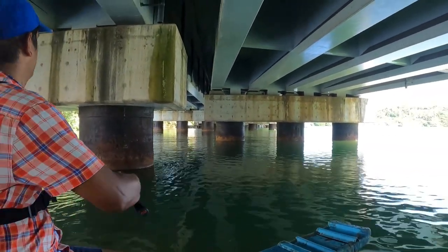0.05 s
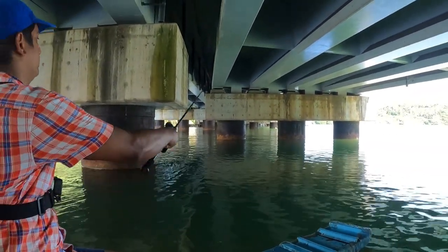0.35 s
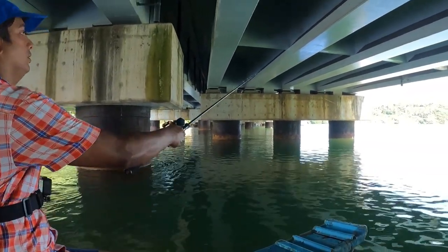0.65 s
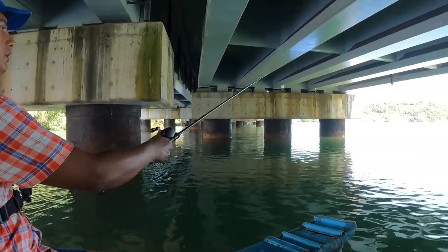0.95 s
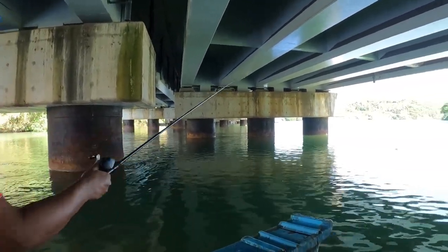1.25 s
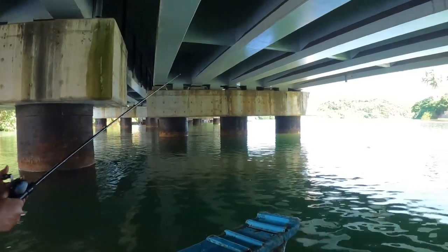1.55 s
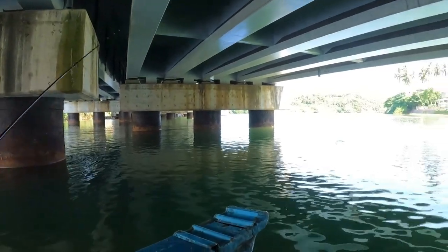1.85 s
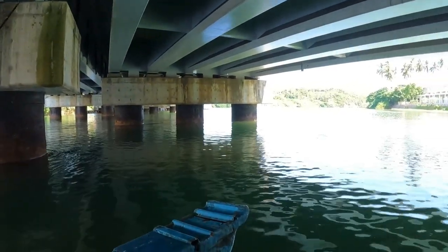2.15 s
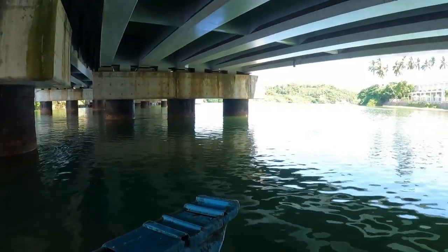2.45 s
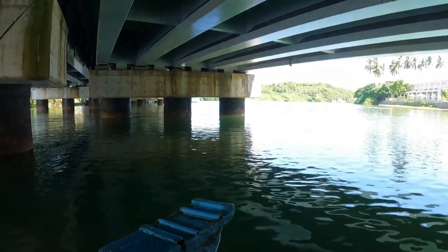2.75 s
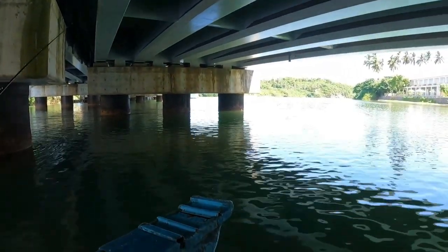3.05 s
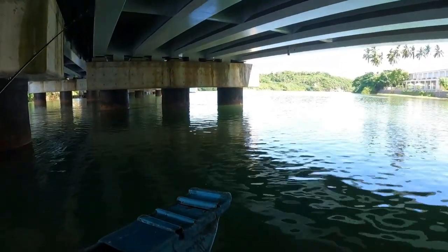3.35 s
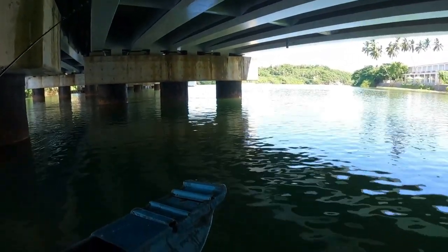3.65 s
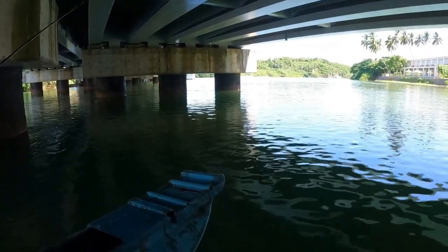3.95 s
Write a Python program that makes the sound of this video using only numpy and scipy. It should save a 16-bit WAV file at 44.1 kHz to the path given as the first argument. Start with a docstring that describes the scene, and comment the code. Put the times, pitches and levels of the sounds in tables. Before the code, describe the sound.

Traffic rumbles and thuds over a bridge, heard from below, with faint fishing reel clicks.

```python
"""Under a girder road bridge, a small boat lies on the water. Traffic overhead shakes the deck
(the slab that carries the road), wheels rumble and tyres roar. Axles thud over the joints,
ringing the girders and booming between deck and water. Insects buzz on the bank over a faint
hiss of water and leaves. Close by, an angler's sleeve and line rustle, the reel clicks,
and a cast ends in a soft splash."""
import sys
import numpy as np
from scipy import signal
from scipy.fft import rfft, irfft
from scipy.io import wavfile

SR = 44100
rng = np.random.default_rng(int(sys.argv[2]) if len(sys.argv) > 2 else 0)


def file_out(sig):
    """Save sig as 16-bit WAV at sys.argv[1]."""
    # one column per channel
    cols = np.atleast_2d(sig).T
    # limit, then scale
    lim = np.clip(cols, -1, 1)
    pcm = np.round(lim * 32767).astype(np.int16)
    wavfile.write(sys.argv[1], SR, pcm)


N = 176400  # 4 seconds
TIME = np.arange(N) / SR
FREQS = np.maximum(np.arange(N // 2 + 1) * SR / N, 1)

# How loud each sound is as time passes. Each row: time in seconds, level in dB.
HISS_LEVEL = [(0, -56), (.65, -54.5), (1.2, -58.5), (1.8, -57.5), (2.3, -56.5), (2.6, -62), (3.2, -66),
              (4, -74)]
LOW_INSECT_LEVEL = [(0, -89.5), (.9, -71.5), (1.7, -67), (2.6, -62), (2.85, -65), (3.2, -72.5), (3.5, -64),
                    (4, -75)]
HIGH_INSECT_LEVEL = [(0, -85), (1.85, -84), (2.2, -77.5), (2.6, -84), (2.85, -80), (3.15, -71.5),
                     (3.5, -74), (3.751, -71), (4, -71)]
RUSTLE_LEVEL = [(0, -85), (.38, -82), (.47, -58), (.62, -62), (.85, -68), (.96, -59), (1.1, -64),
                (1.27, -67), (1.33, -59.5), (1.56, -54), (1.8, -62), (2.05, -70), (4, -75)]
SWAY_LEVEL = [(0, -26), (.15, -34), (.3, -30.5), (.9, -31.5), (1.0, -24), (1.16, -19), (1.38, -26),
              (1.6, -26), (2.25, -27.5), (2.45, -20.5), (2.58, -21), (2.75, -18.5), (3.06, -18.5),
              (3.18, -27.5), (3.3, -26.5), (3.6, -23), (3.78, -26), (3.88, -20.5), (4, -24)]
RUMBLE_LEVEL = [(0, -37), (.5, -32), (.78, -34.5), (.95, -28), (1.25, -35), (1.6, -38.5), (2.05, -35.5),
                (2.25, -38), (2.5, -27.5), (3.05, -26.5), (3.3, -29.5), (3.6, -34), (4, -28)]
TYRE_LEVEL = [(0, -42), (.65, -40.5), (.95, -40.7), (1.25, -46), (1.5, -44), (2.2, -43), (2.7, -43.7),
              (3.15, -46), (3.55, -43), (4, -41)]

# The mix of low and high tones in each noise. Each row: frequency in Hz, strength in dB.
HISS_TONE = [(800, -11.5), (2500, 3), (3400, -1.5), (4200, 4), (5000, -6.5), (7200, -10.5), (8300, -23),
             (10500, -26), (12200, -30.5), (15000, -57)]
RUSTLE_TONE = [(1500, -4), (4000, 3.5), (7000, -0.5), (9000, -11.5), (12300, -14), (15000, -33)]
SPLASH_TONE = [(400, 1.5), (680, 5), (1500, 3.5), (1900, 8), (2400, 0), (3400, -2.5), (4500, -6),
               (7000, -13.5), (10000, -18.5), (12500, -35), (15000, -43)]
SNAP_TONE = [(800, -6), (2200, 5.5), (3300, 2.5), (4250, 4.5), (5000, 4), (6400, -4), (7800, -1.5),
             (8800, -11), (14000, -39)]
RUMBLE_TONE = [(15, -23), (24, -1), (35, 0), (65, 0), (110, 1), (145, -4.5), (195, -3), (260, -10.5),
               (350, -12), (470, -24), (700, -25.5), (1500, -46), (4000, -82), (12000, -110)]
TYRE_TONE = [(100, -5), (290, 0.5), (390, -2), (520, 1.5), (780, -3), (1080, 1.5), (1350, -1.5),
             (1600, -1.5), (2100, -6.5), (2800, -11.5), (4200, -16.5), (6500, -25), (9000, -37.5),
             (15000, -69.5)]
BOOM_TONE = [(18, -23.5), (30, -8.5), (55, 1.5), (88, 0), (135, -1.5), (165, 4), (215, -0.5), (310, -6.5),
             (400, -9), (500, -16), (800, -16.5), (1200, -17.5), (2500, -27), (5000, -41.5)]

# The notes a thing rings with when hit. Each row: pitch in Hz, strength in dB, seconds to fade 60 dB.
REEL_NOTES = [(1990, -6, 0.011), (2710, -10, 0.022), (4315, -3.5, 0.018), (5320, -9.5, 0.024),
              (6330, -10.5, 0.016), (7200, -8, 0.011), (7630, -5.5, 0.013)]
GIRDER_NOTES = [(102.6, 0.5, 0.72), (118.3, -12, 0.8), (180, -11, 0.7), (200, -3, 0.65), (228, -4, 0.15),
                (360, -16, 0.2), (522.7, -23, 0.38)]
DECK_NOTES = [(55.4, 1, 0.68), (41, -6, .55)]

# How alike noise is in the two ears. Each row: frequency in Hz, likeness (1 means the same).
EAR_LIKENESS = [(30, 1), (70, .999), (130, 0.98), (250, 1), (500, 0.89), (1000, .77), (2000, 0.63),
                (6000, 0.67), (14000, 0.54)]
# How noise leans to one side. Each row: frequency in Hz, left minus right in dB.
LEFT_LEAN = [(30, 3), (70, 0.9), (130, -0.6), (250, 2), (500, 2.5), (2000, 3), (8000, 2.5)]
# The reel's clicks. Each row: start in seconds, level in dB, extra lean to the left in dB,
# level of the sharp tick in dB compared with the snap.
REEL_CLICKS = [(.4945, -34.5, 2, -26), (.498, -40, 2, -30), (.519, -40.5, 2, -14), (1.396, -50, -1, -2),
               (1.401, -37.5, -1, -26), (1.503, -37.5, -1, -22), (1.508, -40, -1, -15),
               (1.596, -40.5, 1, -28), (2.7142, -39, 5, -15), (2.7403, -31.5, 5, -15),
               (2.7438, -29.5, 5, -32), (2.7455, -33, 5, -32)]
# The deck's pitch, which shifts with the load. Each row: time in seconds, pitch in Hz.
SWAY_PITCH = [(0, 45.97), (.7, 47.11), (1.1, 51.2), (1.4, 49.95), (2.3, 46.42), (2.8, 45.16), (4, 42.35)]
# The whine of tyre tread. Each row: pitch in Hz, band width in Hz, dB compared with the roar.
TREAD_WHINES = [(1070, 130, -17), (381, 83, -9.5)]
# Single cars. Each row: loudest moment in seconds, seconds from then to half strength,
# peak level in dB, pitch in Hz, band width in Hz.
PASSING_CARS = [(.3, .3, -49, 1137, 200), (.68, .13, -51, 1610, 400), (2.8, 0.19, -46.5, 974, 360)]
# Axles hitting joints. Each row: start in seconds, boom level in dB, Hz above which the boom is dull,
# girder ring in dB, deck kick in dB, rise time of boom and ring in seconds.
AXLE_HITS = [(0.83, -28.5, 130, -34.5, -40, 0.014), (0.93, -25, 483, -31.5, -13.5, .006),
             (1.079, -23, 189, -34, -12.5, 0.009), (1.17, -30, 150, -30.5, -31.5, 0.021),
             (1.514, -25.5, 164, -38, -36, 0.011), (2.29, -23.5, 1200, -13, -35, 0.0035),
             (2.392, -26.5, 790, -31.5, -21, 0.0086), (2.635, -27.5, 1494, -15.5, -35, 0.028),
             (3.205, -34, 304, -26.5, -27.5, .01)]


def from_db(db):
    """Turn decibels into a number to multiply a sound by."""
    return np.exp(np.asarray(db) * (np.log(10) / 20))


def rms_one(x):
    """Scale a signal so that its average power is 1."""
    return x / np.sqrt(np.mean(x ** 2) + 1e-20)


def level(rows):
    """Join (seconds, dB) rows into a smooth volume curve."""
    return from_db(np.interp(TIME, *np.transpose(rows)))


def over_hz(rows):
    """Fill in (Hz, value) rows for every frequency."""
    hz, value = np.transpose(rows)
    return np.interp(np.log(FREQS), np.log(hz), value)


def tone(rows):
    """Turn (Hz, dB) rows into a filter."""
    return from_db(over_hz(rows))


def band(hz, width_hz):
    """A filter that favours the frequencies around one pitch."""
    return 1 / (1 + ((FREQS ** 2 - hz ** 2) / (FREQS * width_hz)) ** 2)


def pan(db):
    """Left and right volumes; positive dB leans left."""
    return from_db(np.array([[.5], [-.5]]) * db)


def drift(rate_hz):
    """A random wobble of about 1 either way, mostly slower than the given rate."""
    return rms_one(irfft(rfft(rng.standard_normal(N)) / (1 + (FREQS / rate_hz) ** 2), N))


def noise(shape):
    """Filtered stereo noise of power 1, as it fills the space under the deck."""
    shared, apart = rfft(rng.standard_normal((2, N)))
    alike = np.clip(over_hz(EAR_LIKENESS), 0, 1)
    ears = np.sqrt(1 + alike) * shared + np.sqrt(1 - alike) * apart * [[1], [-1]]
    return rms_one(irfft(ears * shape * pan(over_hz(LEFT_LEAN)), N))


def burst(start, rise_s, fade_s):
    """A volume curve that rises quickly and dies away, by 60 dB in fade_s."""
    age = np.maximum(TIME - start, 0)
    return np.minimum(age / rise_s, 1) * from_db(-60 * np.minimum(age / fade_s, 4))


def struck(notes, start, rise_s):
    """One blow makes a thing ring, each note with a slightly random strength."""
    first, out = int(start * SR), np.zeros(N)
    age = TIME[:min(SR, N - first)]
    rise = np.sin(np.pi / 2 * np.minimum(age / rise_s, 1)) ** 2
    for hz, db, fade_s in notes:
        fade = from_db(db + 1.5 * rng.normal() - 60 * np.minimum(age / fade_s, 4))
        out[first:first + len(age)] += rise * fade * np.sin(2 * np.pi * hz * age)
    return out


def water_and_leaves():
    """Water and leaves make a faint, high hiss."""
    return level(HISS_LEVEL) * noise(tone(HISS_TONE))


def insect(level_rows, hz, width_hz):
    """An insect's shrill buzz: a narrow band of noise that flutters."""
    flutter = from_db(1.2 * drift(rate_hz=25))
    return level(level_rows) * rms_one(flutter * noise(band(hz, width_hz)))


def rustle():
    """Sleeve and line rub with a fine, grainy sound as the angler casts."""
    grain = from_db(2.2 * drift(rate_hz=45))
    return level(RUSTLE_LEVEL) * rms_one(grain * noise(tone(RUSTLE_TONE))) * pan(db=-2)


def splash():
    """The cast lands in a short, grainy spray that dies away."""
    spray = noise(tone(SPLASH_TONE))
    grain = from_db(1.5 * drift(rate_hz=130))
    volume = from_db(-38.5) * burst(start=1.498, rise_s=.0016, fade_s=.83)
    return volume * rms_one(spray * grain) * pan(db=-3.5)


def reel():
    """Each click is a snap with a sharp tick and a faint echo; harder clicks ring the reel more."""
    snap, echo = noise(tone(SNAP_TONE)), noise(tone(SNAP_TONE))
    tick = noise(band(hz=10200, width_hz=5000) ** 2)
    hard_click_db, ring_growth = -31, .6
    out, echo_power = 0, 0
    for start, db, pan_db, tick_db in REEL_CLICKS:
        ring = from_db(ring_growth * (db - hard_click_db)) * struck(REEL_NOTES, start, rise_s=.0013)
        crack = from_db(-.5) * (snap + from_db(tick_db) * tick) * burst(start, rise_s=.00055, fade_s=.013)
        out += from_db(db) * pan(pan_db) * (ring + crack)
        echo_power += (from_db(db - 20.5) * burst(start, rise_s=.0056, fade_s=.5)) ** 2
    return out + echo * np.sqrt(echo_power)


def deck_sway():
    """Wheels shake the deck at random, so it bends and hums at its lowest note."""
    swing = drift(rate_hz=11.9) + 1j * drift(rate_hz=11.9)  # random in both size and timing
    swing /= (np.abs(swing) + .091) ** .31  # partly evens out big and small swings
    cycles = np.cumsum(np.interp(TIME, *np.transpose(SWAY_PITCH))) / SR
    hum = (swing * np.exp(2j * np.pi * cycles)).real
    return level(SWAY_LEVEL) * rms_one(hum) * pan(db=.45)


def wheel_rumble():
    """Vehicles rolling overhead make a deep rumble."""
    return level(RUMBLE_LEVEL) * noise(tone(RUMBLE_TONE))


def tyre_roar():
    """Tyres roar on the road, and their tread adds two whines."""
    whine = sum(from_db(db) * noise(band(hz, width_hz)) for hz, width_hz, db in TREAD_WHINES)
    return level(TYRE_LEVEL) * (noise(tone(TYRE_TONE)) + whine)


def passing_cars():
    """Each car's tyres sing around one pitch, swelling and fading as it passes."""
    out = 0
    for peak_s, span_s, db, hz, width_hz in PASSING_CARS:
        swell = from_db(db) / (1 + ((TIME - peak_s) / span_s) ** 2)
        out += swell * noise(band(hz, width_hz))
    return out


def axle_thuds():
    """Each axle sets off a boom (duller from a far joint), rings the girders and kicks the deck."""
    out, boom_tone = 0, tone(BOOM_TONE)
    for start, boom_db, dull_hz, ring_db, kick_db, rise_s in AXLE_HITS:
        dulling = 1 / np.sqrt(1 + (FREQS / dull_hz) ** 4)
        out += from_db(boom_db) * noise(boom_tone * dulling) * burst(start, rise_s, fade_s=1.53)
        out += from_db(ring_db) * struck(GIRDER_NOTES, start, rise_s) * pan(db=1.1)
        out += from_db(kick_db) * struck(DECK_NOTES, start, rise_s=.0078) * pan(db=1)
    return out


def scene():
    """Add up bridge, bank and angler; the bridge reaches the left ear slightly first."""
    left, right = deck_sway() + wheel_rumble() + tyre_roar() + passing_cars() + axle_thuds()
    delay_s = .000015
    late_right = irfft(rfft(right) * np.exp(-2j * np.pi * FREQS * delay_s), N)
    bank = water_and_leaves()
    bank += insect(LOW_INSECT_LEVEL, hz=7053, width_hz=200)  # the nearer one
    bank += insect(HIGH_INSECT_LEVEL, hz=10020, width_hz=230)
    angler = reel() + rustle() + splash()
    return np.array([left, late_right]) + bank + angler


def record(dry):
    """Cut away the very highest treble."""
    cutoff_hz = 15500
    return signal.sosfilt(signal.ellip(8, .2, 70, cutoff_hz, fs=SR, output="sos"), dry)


dry = scene()
out = record(dry)
file_out(out)
```